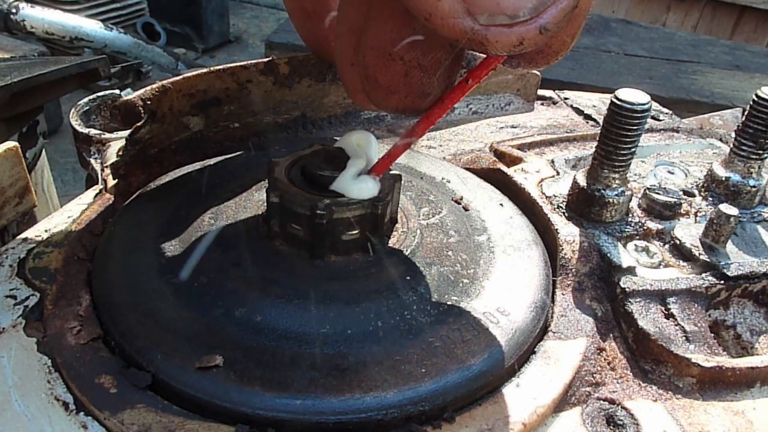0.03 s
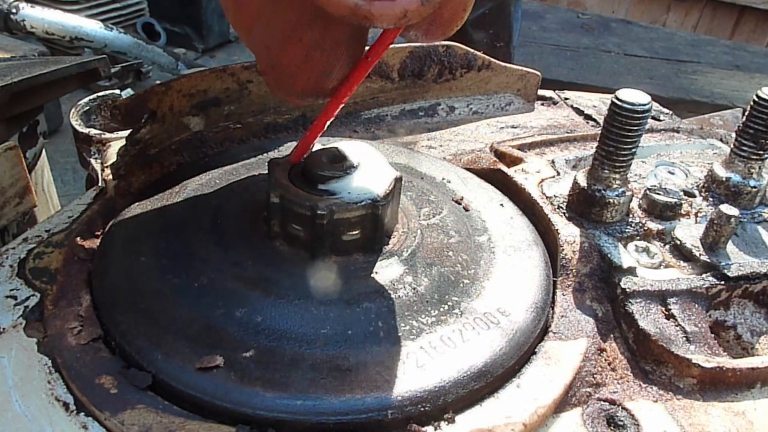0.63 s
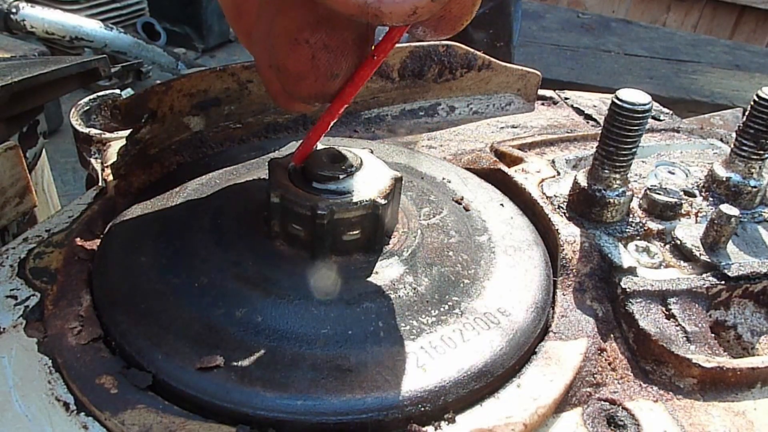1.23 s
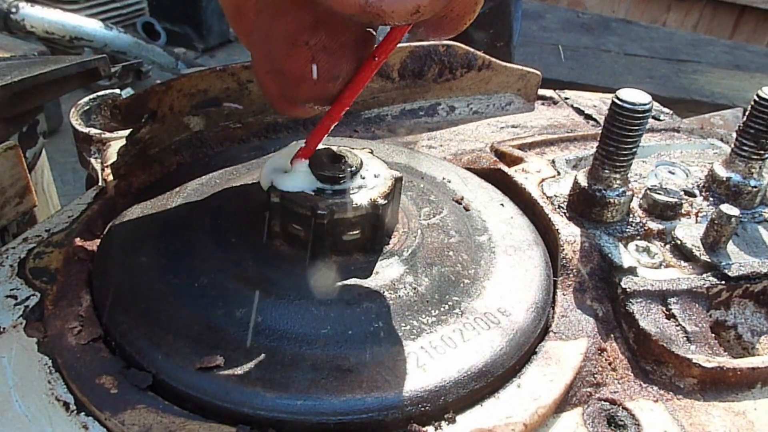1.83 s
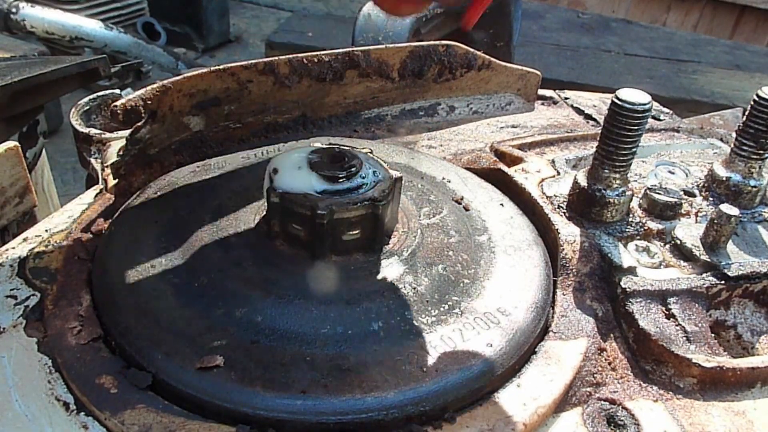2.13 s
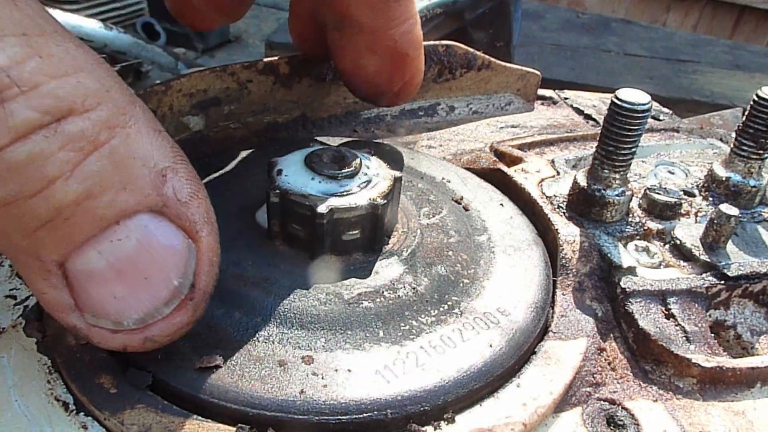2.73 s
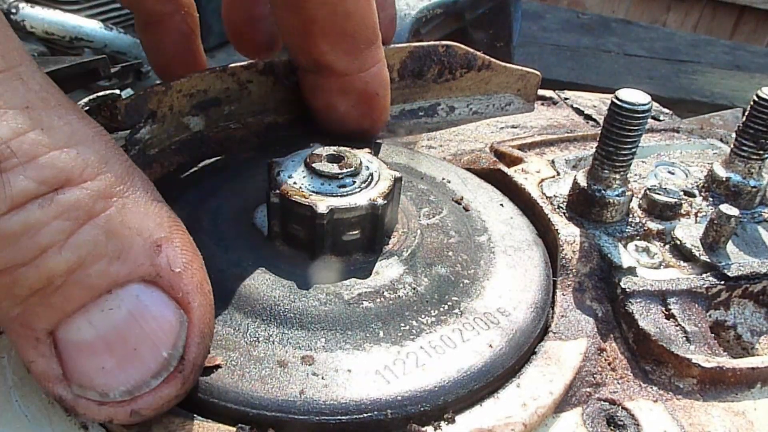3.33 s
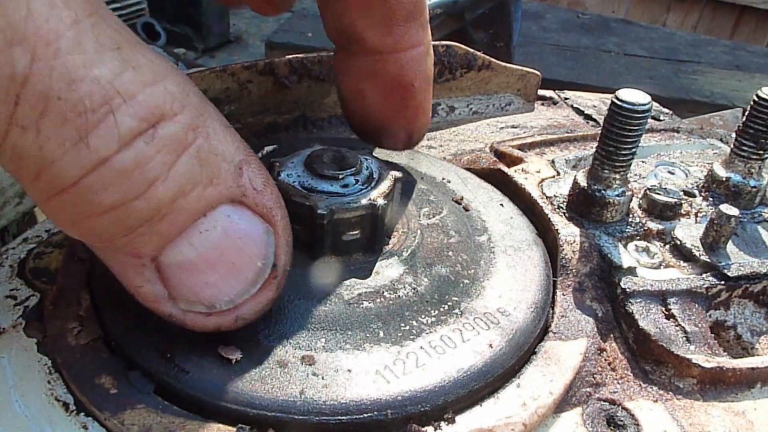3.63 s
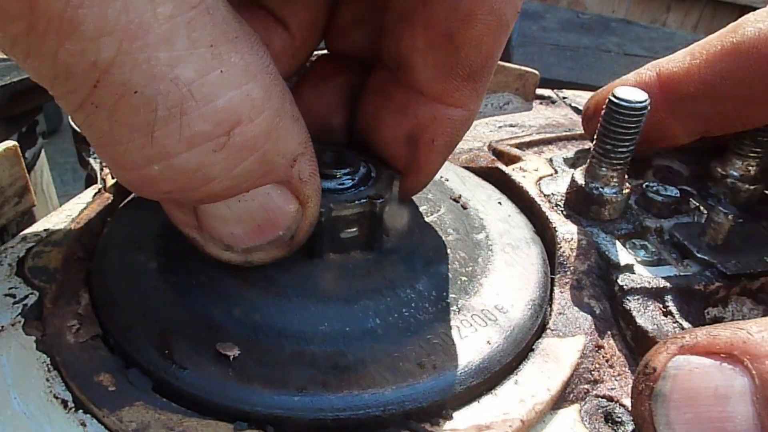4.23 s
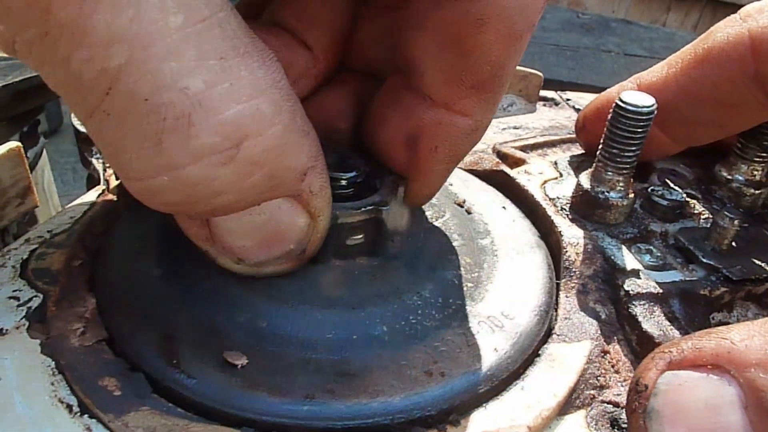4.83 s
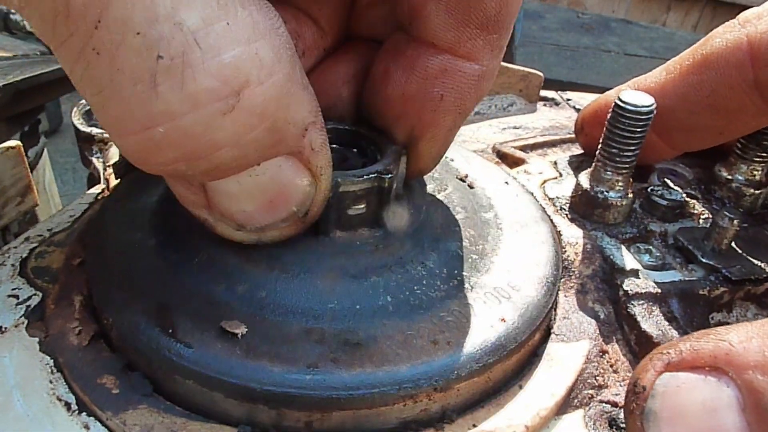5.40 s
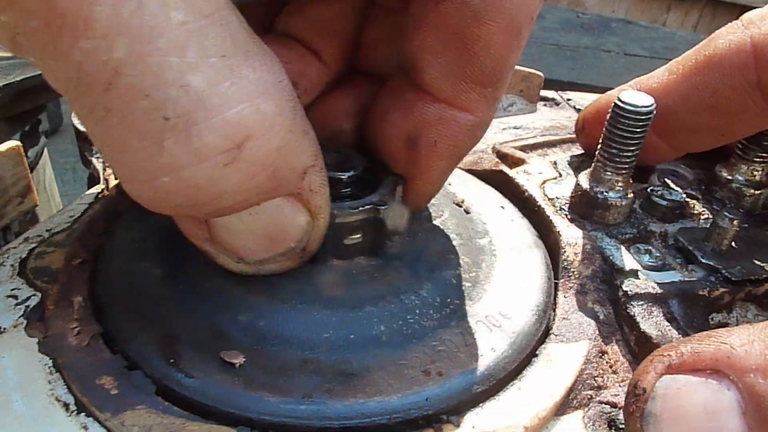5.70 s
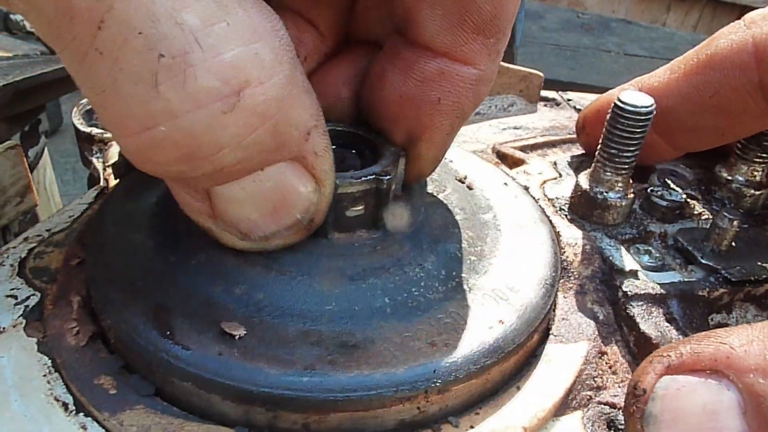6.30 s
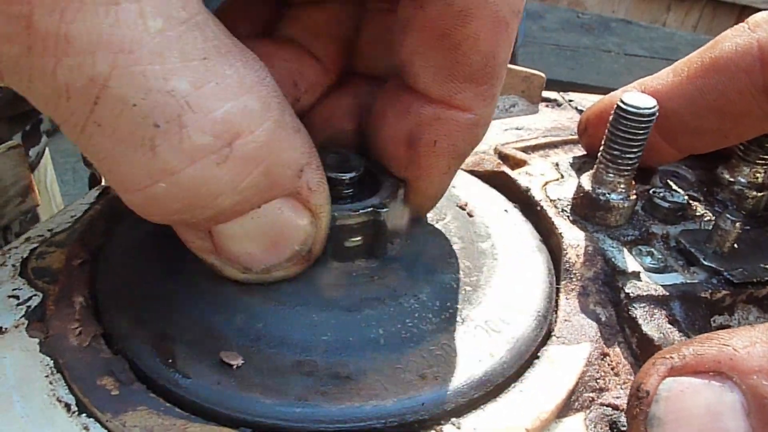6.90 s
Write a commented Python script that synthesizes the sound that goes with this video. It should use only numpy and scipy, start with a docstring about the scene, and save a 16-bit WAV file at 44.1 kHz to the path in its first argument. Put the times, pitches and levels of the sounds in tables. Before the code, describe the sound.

A spray can gives two short squirts of oil, the second one spluttering. Light tinny taps and a thin, squeaky scrape follow, and the can thumps down on a workbench. Fingers rub over gritty metal, then work a chainsaw's clutch drum up and down in a quick, even rhythm, each pull clicking and each push knocking. It is all heard up close over steady workshop noise.

```python
"""Oiling a chainsaw clutch

Close up at a workshop bench, one microphone, left channel only. Two squirts of spray oil hiss through
a straw onto the clutch shaft, and the can is set down hard. Fingers rub over the oily steel and work
the drum up and down: each pull scrapes and clicks against the stop, each push scrapes and knocks into
the saw's housing. Steady workshop noise lies underneath; the recorder's gain ducks it at each squirt."""
import sys
import numpy as np
from scipy import signal
from scipy.fft import rfft, irfft, next_fast_len
from scipy.io import wavfile
from scipy.ndimage import uniform_filter1d, map_coordinates

SR = 44100
rng = np.random.default_rng(int(sys.argv[2]) if len(sys.argv) > 2 else 0)


def waveform_to_disk(signal):
    """Save audio, clipped to [-1, 1], as 16-bit WAV at the path in sys.argv[1]."""
    frames = np.transpose(np.atleast_2d(signal))
    scaled = np.clip(frames, -1, 1) * 32767
    samples = np.round(scaled).astype(np.int16)
    wavfile.write(sys.argv[1], SR, samples)


N = 315480
TIME = np.arange(N) / SR
RING_TIME = TIME[:SR * 3 // 4]

# Levels in all tables are relative: each source adds its own gain.
# presses of the valve: start/s, end/s, steady level/dB, opening surge/dB, first wetness/0-1
SQUIRTS = [(0, 0.13, -42.5, 4.5, 0.13), (1.7167, 1.883, -43.5, 14, 1)]
# resonances of the saw's housing: f/Hz, width/Hz, level/dB
HOUSING_MODES = [(276.6, 98, -14.5), (385, 125, -8.5), (560, 87, 3), (700, 173, -1.5), (1180, 440, -22.5)]
# the steel drum, damped by the fingers: f/Hz, width/Hz, level/dB
HELD_DRUM_MODES = [(1320, 67, -2.5), (1837, 110, 2.5), (2090, 75, 1), (2523, 55, 0.5), (2940, 19, -2.5),
                   (3406, 63, 4), (5050, 140, -1), (5650, 120, 2), (6160, 110, -5.5), (6730, 61, -1)]
# the drum pushed home: t/s, thud/dB, clack/dB, tick/dB, drum ring/dB, teeth/dB, housing pitch/ratio,
# first touch/dB re the blow, rebound/dB re the blow, slide/s, slide/dB
PUSHES = [(4.83, -9, -23, -38, -47, -50, 0.97, 2.5, -38, 0.029, -35.5),
          (5.1993, -9, -25.5, -42, -54, -56, 1.01, -12, -8.5, 0.04, -37),
          (5.623, -6, -17.5, -39, -55, -39, 0.99, -3.5, -18.5, 0.031, -37),
          (6.0372, -5, -14.5, -27, -60, -49, 1.026, -22, -16, .052, -37.5),
          (6.4439, -11.5, -28.5, -40.5, -45, -51, 1.03, 3, -15, 0.042, -42),
          (6.8816, -5.5, -18.5, -35.5, -33, -52, 1.01, -29, -16, 0.032, -37)]
# the drum pulled to its stop: t/s, thud/dB, clack/dB, tick/dB, drum ring/dB, teeth/dB,
# rattle/s, rattle/dB re the blow, slide/s, slide/dB, catch lead/s, catch/dB
PULLS = [(4.4346, -21.5, -36, -39, -58, -55, .016, -5, 0.0052, -37.5, 0.029, -41),
         (4.9488, -22, -21.5, -30.5, -37, -49, 0.0038, -12, 0.025, -40, .016, -33.5),
         (5.3548, -18, -23.5, -29, -34, -29, 0.018, -8, .002, -28.5, .002, -47),
         (5.81, -21.5, -30.5, -19.5, -37.5, -40, 0.013, -9.5, .02, -34, 0.014, -30.5),
         (6.2048, -22, -22.5, -31, -42, -49, .004, -18, 0.052, -47.5, 0.0283, -36),
         (6.613, -21.5, -22, -34, -55, -37, 0.0042, -8.5, 0.042, -43, 0.016, -31),
         (7.0746, -16.5, -24.5, -32.5, -48, -40, .008, -21, 0.026, -40.5, 0.016, -24)]


def amp(db):
    """Decibels to gain."""
    return 10 ** (np.asarray(db) / 20)


def unit(x):
    """Scale to rms 1."""
    return x / np.sqrt(np.mean(x ** 2) + 1e-20)


def crest(x):
    """Scale so that the loudest millisecond has rms 1."""
    power = np.abs(signal.hilbert(x)) ** 2 / 2
    return x / np.sqrt(uniform_filter1d(power, size=44).max())


def along(points, hz):
    """Read (f/Hz, value) points on a log axis."""
    f, values = np.transpose(points)
    return np.interp(np.log(hz + 1), np.log(f), values)


def wobble(rate):
    """A smooth random curve, rate knots a second."""
    return map_coordinates(rng.standard_normal(int(N * rate / SR) + 4), [TIME * rate / SR])


def filtered(x, response):
    """Filter x by a complex response of frequency."""
    size = next_fast_len(len(x) + SR // 4)
    return irfft(rfft(x, size) * response(np.fft.rfftfreq(size, 1 / SR)), size)[:len(x)]


def coloured(x, spectrum):
    """x shaped by a (f/Hz, level/dB) spectrum, at rms 1."""
    return unit(filtered(x, lambda hz: amp(along(spectrum, hz))))


def impulse(spectrum, size=2048):
    """The causal pulse that has this spectrum."""
    magnitude = amp(along(spectrum, np.fft.rfftfreq(size, 1 / SR)))
    cepstrum = irfft(np.log(magnitude + 1e-6))
    fold = 1 + np.sign(size // 2 - np.arange(size)) * (np.arange(size) > 0)
    return irfft(np.exp(rfft(cepstrum * fold)))


def resonances(modes, hz):
    """Causal response of (f/Hz, width/Hz, level/dB) resonances."""
    return sum((-1) ** k * amp(db) * 1j * hz * width / (f * f - hz * hz + 1j * hz * width)
               for k, (f, width, db) in enumerate(modes))


def peaked(x, modes):
    """x with the ringing of resonances added to it."""
    return filtered(x, lambda hz: 1 + sum(resonances([mode], hz) for mode in modes))


def fade(t, t60):
    """Exponential decay, 60 dB in t60 seconds."""
    return np.exp(-np.log(1000) * t / t60)


def ring(modes):
    """(f/Hz, level/dB, t60/s) modes, struck at new strengths each time."""
    return sum(rng.choice([-1, 1]) * amp(db + rng.uniform(-2, 2))
               * fade(RING_TIME, t60) * np.sin(2 * np.pi * hz * RING_TIME) for hz, db, t60 in modes)


def dying(noise, decay):
    """Each frequency of the noise dies at its own speed."""
    hz, t, bands = signal.stft(noise, SR, nperseg=256)
    bands = bands * fade(t, along(decay, hz)[:, None])
    return signal.istft(bands, SR, nperseg=256)[1][:len(noise)]


def grit(rate, spread_db):
    """Tiny impulses of uneven size at random moments, about rate a second."""
    slips = rng.standard_normal(N) * (rng.random(N) < rate / SR)
    return slips * amp(spread_db * rng.standard_normal(N))


def swell(s, half):
    """A bell-shaped rise and fall around time s."""
    return np.exp(-np.minimum(((TIME - s) / half) ** 2, 40))


def held(start, end, attack_s, release_s):
    """Rise towards 1 from start, hold, and die away from end."""
    rise = 1 - np.exp(-np.maximum(TIME - start, 0) / attack_s)
    return rise * np.exp(-np.maximum(TIME - end, 0) / release_s)


def strokes(rows, drop_db=18):
    """Stroke pressure, drop_db weaker one rise before and one fall after each peak."""
    return sum(amp(db - drop_db * np.maximum((s - TIME) / rise, (TIME - s) / fall))
               for s, rise, fall, db in rows)


def add(track, s, sound):
    """Mix a sound in at time s."""
    part = track[round(s * SR):][:len(sound)]
    part += sound[:len(part)]


def workshop_noise():
    """Steady background noise grows a little deeper; the recorder's gain ducks it after each squirt."""
    drift = [(0, -50, -3.5), (2.3, -49, -4), (3.2, -48, -1), (7.15, -51.5, 4.5)]  # course of the noise: t/s, level/dB, bass/dB
    spectrum = [(18, -85), (30, -62.5), (110, -20), (156, -17), (197, -8), (237, -7.5), (396, -3),
                (561, -7), (675, -4.5), (724, -7.5), (813, -5.5), (2160, -19.5), (4140, -25.5),
                (5860, -31.5), (7750, -52), (10100, -68.5), (17000, -120)]  # its colour: f/Hz, level/dB
    times, levels, basses = np.transpose(drift)
    level_db, bass_db = np.interp(TIME, times, levels), np.interp(TIME, times, basses)
    duck_db = -7.5 * sum(held(start, end, attack_s=0.014, release_s=0.11) for start, end, *_ in SQUIRTS)
    noise = coloured(rng.standard_normal(N), spectrum)
    bass = filtered(noise, lambda hz: 1 / (1 + (hz / 260) ** 4))
    return amp(level_db + duck_db + 6 + 0.5 * wobble(9)) * (noise + (amp(bass_db) - 1) * bass)


def spray():
    """A turbulent jet surges as the valve opens and splutters until the straw is clear."""
    dry_jet = [(120, -74), (200, -52), (516, -17), (549, -3.5), (781, -0.5), (953, -8.5), (1180, 0),
               (1530, -8.5), (1780, -5), (2110, -6.5), (2580, -1), (3240, -7), (5050, -5), (6650, -15.5),
               (7750, -32), (10100, -75), (17000, -120)]  # hiss of the gas: f/Hz, level/dB
    wet_jet = [(120, -50), (200, -12.5), (757, 0), (2180, 6.5), (3000, 4.5), (3290, -48), (3780, -9),
               (5530, -1), (6750, -32), (7750, -80), (10100, -75), (17000, -120)]  # splutter of the liquid: f/Hz, level/dB
    jet_dips = [(3160, 300, -5.5), (6200, 110, -14)]  # notches in both: f/Hz, width/Hz, gain/dB
    spits = [(0.188, 0.0024, -48), (1.882, .004, -37.5)]  # a last drop leaves the straw: t/s, half length/s, level/dB
    surge_s, clearing_s = 0.058, 0.031
    gas_gain = 0
    drop_gain = sum(amp(db) * swell(s, half) for s, half, db in spits)
    for start, end, db, surge_db, wet in SQUIRTS:
        age = np.maximum(TIME - start, 0)
        valve = held(start, end, attack_s=0.00067, release_s=0.0062)
        flow = amp(db + surge_db * np.exp(-age / surge_s)) * valve
        wetness = wet * np.exp(-age / clearing_s)
        gas_gain += flow * np.sqrt(1 - wetness)
        drop_gain += flow * np.sqrt(wetness)
    notches = lambda hz: amp(sum(db * np.exp(-((hz - f) / width) ** 2) for f, width, db in jet_dips))
    gas = unit(filtered(coloured(rng.standard_normal(N), dry_jet), notches))
    drops = unit(filtered(coloured(grit(rate=9200, spread_db=4.5), wet_jet), notches))
    return (gas_gain * gas + drop_gain * drops) * amp(0.42 * wobble(120))


def can_clinks():
    """Light taps buzz briefly through thin metal as the can is lifted away."""
    taps = [(2.106, -41.5), (2.121, -39), (2.205, -40.5), (2.223, -33), (2.227, -33), (2.272, -39),
            (2.456, -42), (2.488, -44.5)]  # contacts on the metal: t/s, level/dB
    tin_modes = [(1950, 230, -10), (2330, 130, 3.5), (3330, 190, -2.5), (3670, 130, 0), (4350, 130, -1),
                 (5240, 200, -9), (6090, 150, -11.5)]  # its resonances: f/Hz, width/Hz, level/dB
    out, t = np.zeros(N), TIME[:SR // 16]
    body = filtered(signal.unit_impulse(len(t)), lambda hz: resonances(tin_modes, hz))
    for s, db in taps:
        buzz = rng.standard_normal(len(t)) * fade(t, t60=0.018)
        add(out, s, amp(db) * crest(signal.fftconvolve(buzz, body)))
    return out


def finger_rubs():
    """Short gritty strokes over oily metal excite the sprocket."""
    rubs = [(2.41, 0.051, 0.063, -51), (2.457, 0.018, 0.015, -52), (3.245, 0.14, 0.03, -46),
            (3.572, 0.009, 0.0081, -47.5), (3.699, 0.037, 0.017, -40), (4.183, 0.019, 0.019, -34),
            (4.22, 0.011, 0.025, -44), (4.367, 0.019, 0.014, -43), (4.408, 0.0068, 0.012, -35.5),
            (4.574, 0.005, 0.025, -37.5), (4.596, 0.0089, 0.0096, -38), (4.724, 0.0097, 0.019, -37.5),
            (4.745, 0.004, 0.025, -41.5)]  # fingers brush the metal: t/s, rise/s, fall/s, level/dB
    friction = [(60, -54), (600, -9), (1600, 5.5), (2500, 1), (3000, 1), (3700, -0.5), (4500, -7.5),
                (5800, -4), (6800, -14), (7700, -48.5)]  # colour of the rubbing: f/Hz, level/dB
    sprocket_modes = [(2610, 230, -2.5), (2795, 160, 9), (3400, 75, 4), (3830, 110, 10.5), (4830, 440, 5),
                      (6350, 310, -6.5)]  # sprocket resonances: f/Hz, width/Hz, level/dB
    scrape = unit(peaked(coloured(grit(rate=1900, spread_db=0), friction), sprocket_modes))
    return strokes(rubs) * amp(3.5 + 1.5 * wobble(300)) * scrape


def light_drag():
    """Something is dragged lightly: fine friction rasps and catches in short, hoarse squeaks."""
    drags = [(2.528, .012, 0.18, -39.5), (2.65, 0.017, 0.057, -44), (2.745, .03, 0.036, -48),
             (3.02, .08, 0.34, -56)]  # dragging strokes: t/s, rise/s, fall/s, level/dB
    friction = [(600, -8), (1600, 2.5), (2500, 7), (5500, 1), (7000, -9.5), (7700, -29)]  # colour of the dragging: f/Hz, level/dB
    rasp_modes = [(2355, 120, 11), (3154, 120, 14), (4600, 400, 1.5), (5610, 550, 5.5)]  # resonances it excites: f/Hz, width/Hz, level/dB
    squeaks = [(2.559, 0.017, 4430, 380, -34.5), (2.591, 0.029, 4700, 190, -42),
               (2.569, 0.0074, 5250, 500, -46), (2.676, .016, 5110, 220, -45),
               (2.735, 0.023, 5700, 280, -58), (2.782, .02, 5070, 180, -60), (3.047, 0.13, 5820, 280, -65)]  # catches: t/s, half length/s, f/Hz, width/Hz, level/dB
    rasp = unit(peaked(coloured(grit(rate=6000, spread_db=0.5), friction), rasp_modes))
    out = amp(3.5) * strokes(drags) * rasp
    for s, half, centre, width, db in squeaks:
        band = lambda hz: resonances([(centre, width, 0)], hz) ** 2
        out += amp(db + 1.5) * swell(s, half) * unit(filtered(rng.standard_normal(N), band))
    return out


def can_set_down():
    """The can thumps the bench: its thin shell pings, and the boards and their clutter ring on."""
    blows = [(3.336, -22, -41.5), (3.391, -43.5, -39.5)]  # it lands and rocks once: t/s, bench/dB, can/dB
    can_modes = [(3110, 0.5, 0.13), (3210, 2.5, 0.086), (5100, -7, 0.069), (5660, -8, 0.12),
                 (6270, -15, .1)]  # the shell: f/Hz, level/dB, t60/s
    long_modes = [(269, -3, .55), (382, -8, .5), (689, -7, .5), (888, 0, .4), (938, -3, .45),
                  (1096, -3, .33), (1173, -5, .4), (1211, -2, .35), (1255, -4, .33), (1478, -7, .28),
                  (1644, -12, .28), (2159, -11, .5)]  # the ringing boards and one long note of the can: f/Hz, level/dB, t60/s
    bench_colour = [(47, -61), (80, -33), (113, -25), (204, -23), (262, -9.5), (574, -6.5), (909, -1.5),
                    (1210, -4), (1550, -13), (2230, -18), (2650, -23), (3030, -23), (3280, -26),
                    (5600, -31), (7750, -71), (10100, -99), (17000, -120)]  # the struck bench and clutter: f/Hz, level/dB
    clutter_decay = [(200, 0.85), (1000, 0.49), (2500, 0.32), (6000, 0.17)]  # ring time of the clutter: f/Hz, t60/s
    out = np.zeros(N)
    thump = crest(impulse(bench_colour, size=8192))
    t = TIME[:len(thump)]
    flex = np.cos(2 * np.pi * 420 * t) + 0.85 * np.cos(2 * np.pi * 900 * t)  # the board gives
    flex *= fade(t, 0.021) * (1 - fade(t, 0.0061))
    for s, bench_db, can_db in blows:
        clutter = amp(1.5) * dying(coloured(rng.standard_normal(len(RING_TIME)), bench_colour),
                                   clutter_decay)
        long_ring = amp(-8.5) * ring(long_modes)
        add(out, s, amp(bench_db) * (amp(10.5) * thump + amp(12) * flex))
        add(out, s, amp(bench_db) * (clutter + long_ring) + amp(can_db) * ring(can_modes))
    # the boards radiate no deep bass and little treble
    return signal.sosfilt(signal.butter(4, [140, 6800], "bandpass", fs=SR, output="sos"), out)


def travel(start, end, attack_s=0.0098, release_s=0.0069):
    """The drum's speed, 0-1: it breaks loose, gathers speed and is stopped."""
    return np.interp(TIME, [start - attack_s, start, end, end + release_s], [0, 0.32, 1, 0])


def drum_slides():
    """The bearing scrapes along the shaft, louder with speed; where it catches it shakes the housing."""
    friction = [(50, -48), (200, -1), (550, 14), (1100, 8), (1600, -2), (2600, -3.5), (3450, -2.5),
                (4100, -8.5), (4900, -4), (5600, -18), (6800, -18), (7700, -46.5)]  # colour of the bearing's scrape: f/Hz, level/dB
    speed = 0
    catching = amp(-32) * swell(4.748, half=0.007)  # the fingers take hold
    for s, *_, slide_s, db in PUSHES:
        speed += amp(db) * travel(s - slide_s, s)
        catching += amp(db + 0.5) * swell(s - 0.0049, half=0.008)  # just short of the stop
    for s, *_, rattle_s, _, slide_s, db, lead_s, catch_db in PULLS:
        speed += amp(db) * travel(s - slide_s, s + rattle_s)
        catching += amp(catch_db) * swell(s - lead_s, half=0.0063)
    scrape = unit(peaked(coloured(grit(rate=4000, spread_db=0.5), friction), HELD_DRUM_MODES))
    shake = coloured(rng.standard_normal(N), [(100, -12), (400, -4), (1200, 0.5), (3000, -17)])
    shudder = unit(filtered(shake, lambda hz: resonances(HOUSING_MODES, hz)))
    scrape_gain = amp(6 + 1.3 * wobble(160)) * (speed + 0.11 * catching)
    return scrape_gain * scrape + amp(0.5) * catching * shudder


def contacts():
    """Pushes touch, land and hop; pulls hit and rattle. Yields t/s, pitch and the five levels/dB."""
    hops = [(.6, -6), (0.998, -0.5)]  # two hops after a pull: share of the rattle length, level/dB
    touch_lead_s, rebound_s, pull_pitch = 0.003, 0.00555, 1.04
    touch_tilt_db = [-17.5, 0, 0, 0, 0]  # the first touch barely moves the housing
    hop_tilt_db = [3, 0, -12, 0, 0]  # hops keep more thud and less tick
    for s, *blow_db, pitch, touch_db, rebound_db, _, _ in PUSHES:
        blow_db = np.array(blow_db)
        yield s - touch_lead_s, pitch, *(blow_db + touch_db + touch_tilt_db)
        yield s, pitch, *blow_db
        yield s + rebound_s, pitch, *(blow_db + rebound_db)
    for s, *blow_db, rattle_s, rattle_db, _, _, _, _ in PULLS:
        blow_db = np.array(blow_db)
        yield s, pull_pitch, *blow_db
        for share, db in hops:
            yield s + share * rattle_s, pull_pitch, *(blow_db + rattle_db + db + hop_tilt_db)


def drum_knocks():
    """Each contact shoves the damped housing and clacks; the drum rings on when held loosely."""
    clack_colour = [(100, -61), (500, -30.5), (1100, 8), (1800, 2.5), (2500, 4), (3400, 1), (3800, -7),
                    (4400, -11), (6000, -41.5)]  # the drum's clack: f/Hz, level/dB
    tick_colour = [(100, -60.5), (2500, -30), (4000, -1), (5000, 8), (5500, -5.5), (6700, -7.5),
                   (7200, -24.5), (7700, -40)]  # the tick of its edge: f/Hz, level/dB
    board_modes = [(205, -6, 0.18), (261.3, 1.5, 0.19), (402, -5.5, 0.042)]  # boards shaken by the saw's body: f/Hz, level/dB, t60/s
    free_drum_modes = [(1770, -6.5, .1), (1980, -3.5, 0.14), (2060, -2.5, 0.13), (2090, -1, 0.065),
                       (2290, -2.5, 0.063), (3120, -14, 0.11), (3350, -22, 0.15)]  # the drum left free to ring: f/Hz, level/dB, t60/s
    teeth_modes = [(3240, -6.5, 0.057), (3430, 0.5, 0.065), (4850, -2.5, 0.035), (4920, -3, 0.037),
                   (5670, -14, 0.026)]  # the ping of the sprocket's teeth: f/Hz, level/dB, t60/s
    out, t = np.zeros(N), TIME[:SR // 16]
    shove = impulse([(60, -3), (250, -4.5), (500, -3), (1200, -7.5), (3000, -7.5), (7000, -45)], 4096)
    clack = peaked(impulse(clack_colour), HELD_DRUM_MODES)
    tick = peaked(impulse(tick_colour), HELD_DRUM_MODES)
    boards = ring(board_modes)
    for s, pitch, thud_db, clack_db, tick_db, ring_db, teeth_db in contacts():
        # the hand's pressure retunes the housing
        thud = crest(filtered(shove, lambda hz: resonances(HOUSING_MODES, hz / pitch)))
        add(out, s, amp(thud_db) * thud)
        add(out, s, amp(thud_db - 30.5) * boards + amp(ring_db) * ring(free_drum_modes))
        add(out, s, amp(teeth_db) * ring(teeth_modes))
        for db, body, t60 in (clack_db, clack, 0.02), (tick_db, tick, 0.012):
            chatter = rng.standard_normal(len(t)) * fade(t, t60)
            chatter[0] = 9  # the first touch is the hardest
            add(out, s, amp(db) * crest(signal.fftconvolve(chatter, body)))
    return out


def room(x):
    """A short answer from the bench and the things around it, 4 ms late."""
    decay = [(200, 0.28), (700, 0.074), (2000, 0.16), (6000, 0.022)]  # ring time of the reflections: f/Hz, t60/s
    tail = dying(rng.standard_normal(SR // 3), decay)
    return signal.fftconvolve(x, np.pad(tail / np.linalg.norm(tail), (SR // 250, 0)))[:N]


def scene():
    """One microphone close to the saw, on the left channel; the right is silent."""
    handling = drum_knocks() + drum_slides() + finger_rubs() + can_clinks() + light_drag()
    mono = handling + amp(-24) * room(handling)
    mono += amp(8) * spray() + amp(4) * can_set_down() + workshop_noise()
    return np.array([mono, np.zeros(N)])


def record(dry):
    """The recorder rounds off the highest peaks, drops the deep bass and cuts the top treble."""
    ceiling_db, low_cut_hz, top_hz = -0.6, 70, 7750
    rounded = dry / (1 + (dry / amp(ceiling_db)) ** 20) ** (1 / 20)
    thinned = signal.sosfilt(signal.butter(2, low_cut_hz, "highpass", fs=SR, output="sos"), rounded)
    band_limit = lambda hz: np.clip((top_hz - hz) / 200, 0, 1)
    return np.array([filtered(channel, band_limit) for channel in thinned])


dry = scene()
out = record(dry)
waveform_to_disk(out)
```